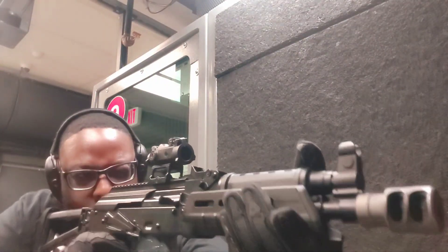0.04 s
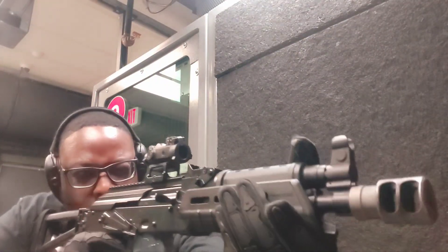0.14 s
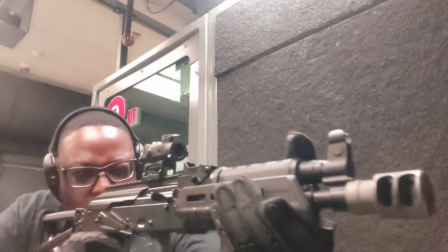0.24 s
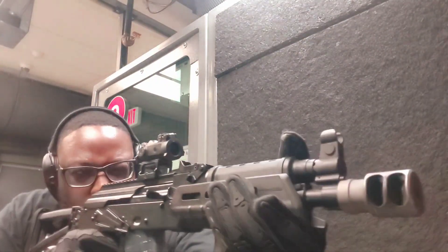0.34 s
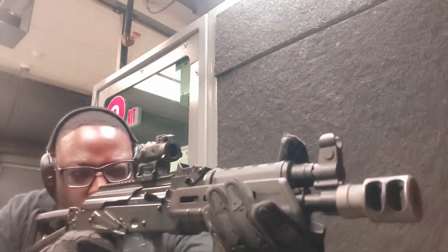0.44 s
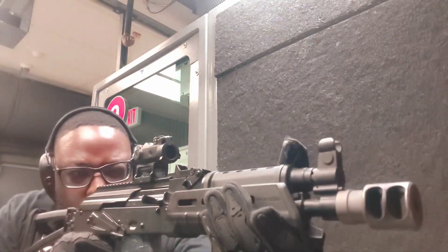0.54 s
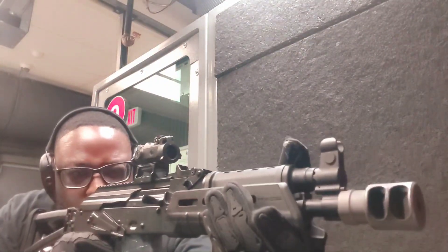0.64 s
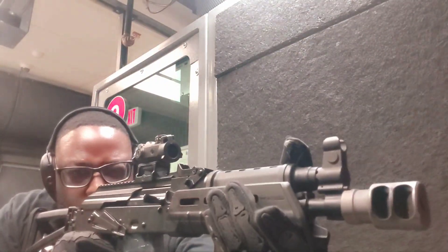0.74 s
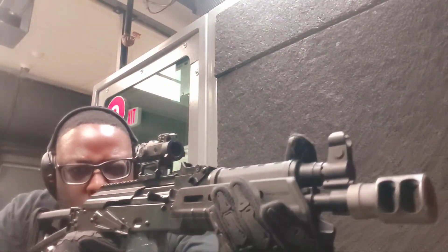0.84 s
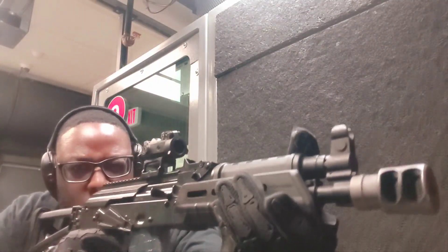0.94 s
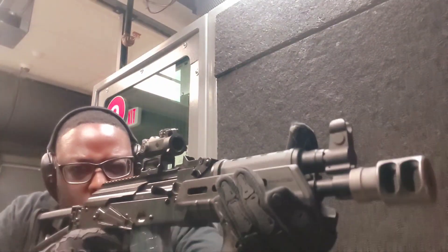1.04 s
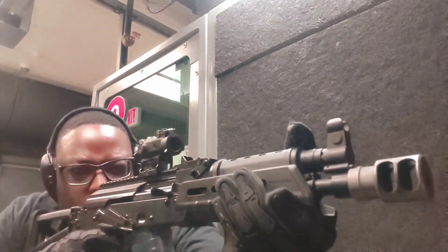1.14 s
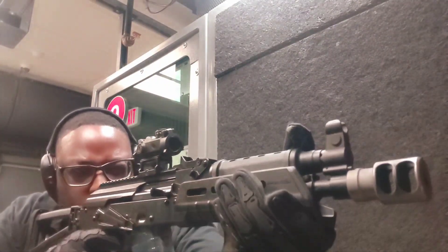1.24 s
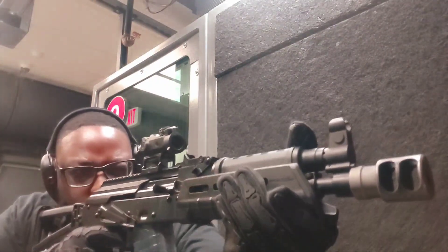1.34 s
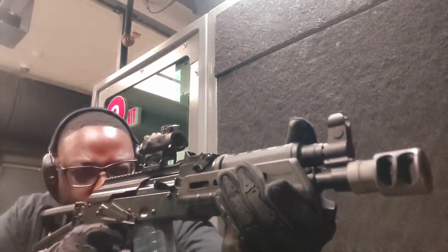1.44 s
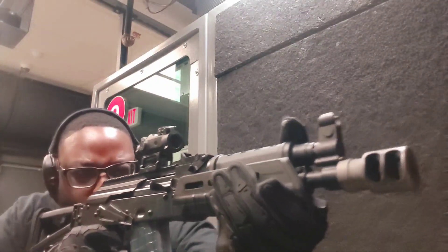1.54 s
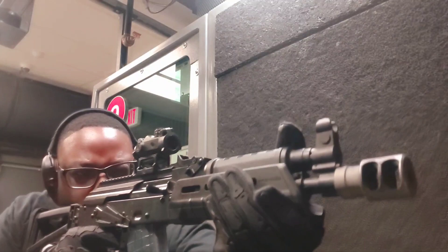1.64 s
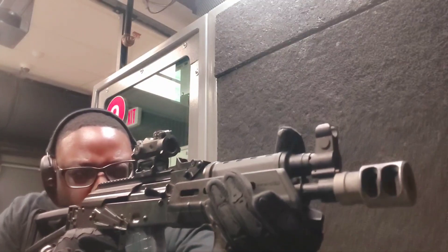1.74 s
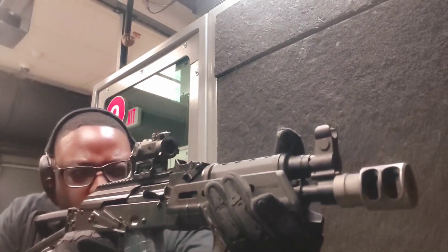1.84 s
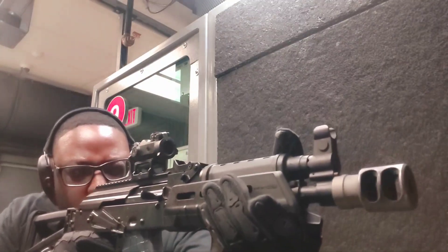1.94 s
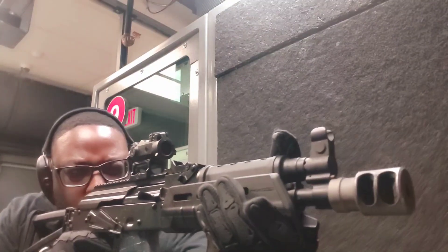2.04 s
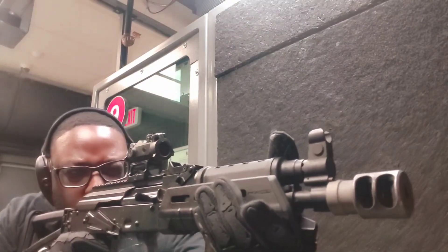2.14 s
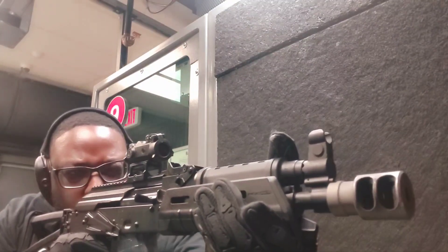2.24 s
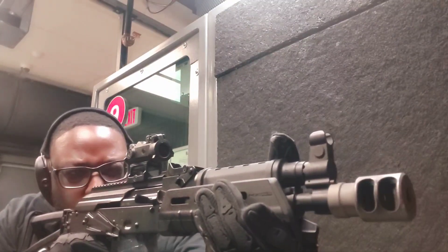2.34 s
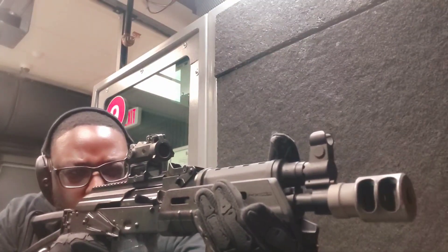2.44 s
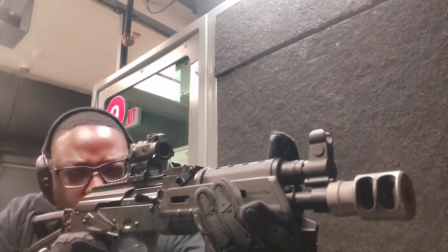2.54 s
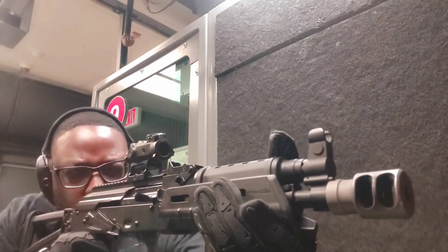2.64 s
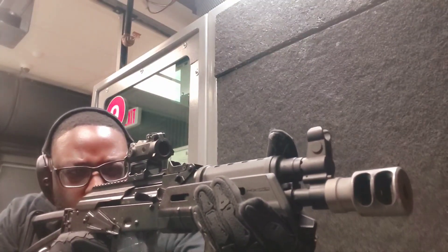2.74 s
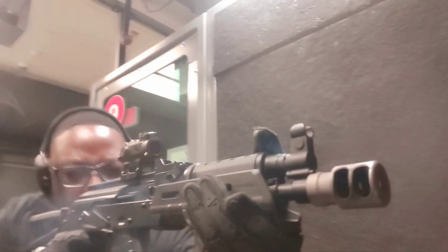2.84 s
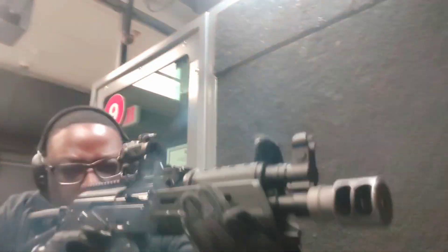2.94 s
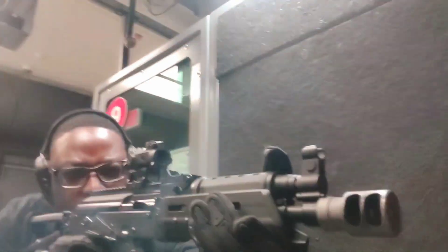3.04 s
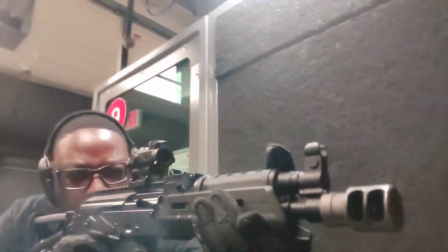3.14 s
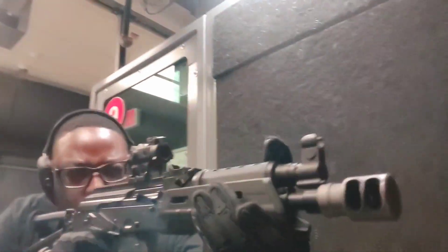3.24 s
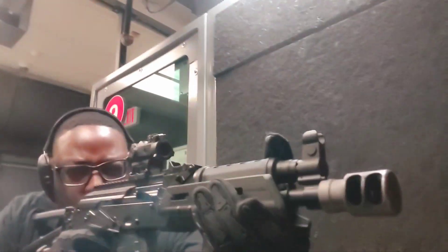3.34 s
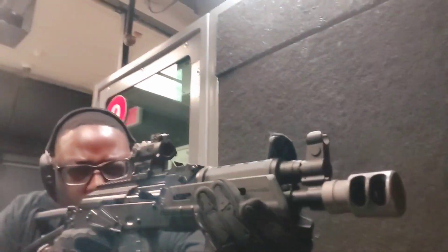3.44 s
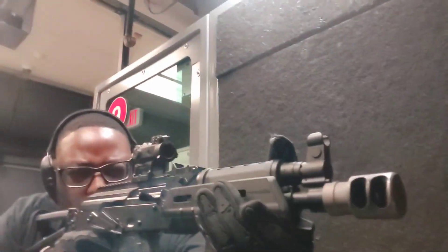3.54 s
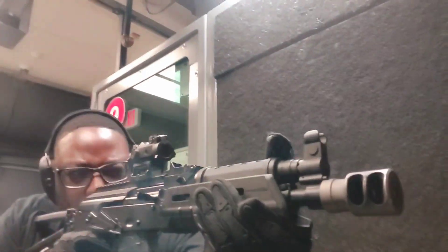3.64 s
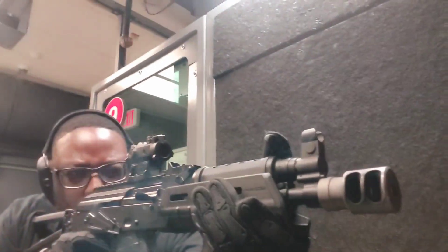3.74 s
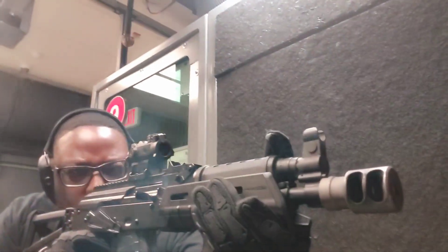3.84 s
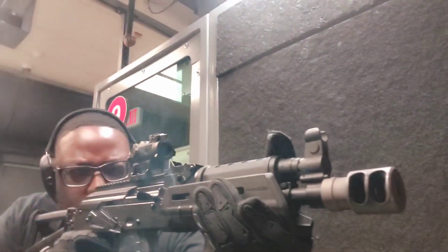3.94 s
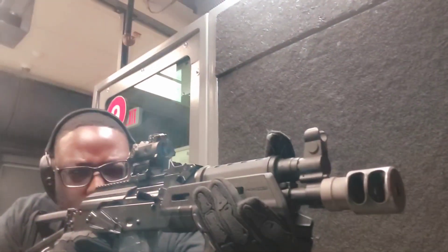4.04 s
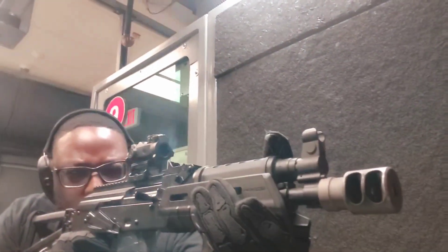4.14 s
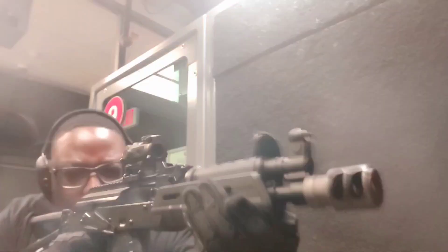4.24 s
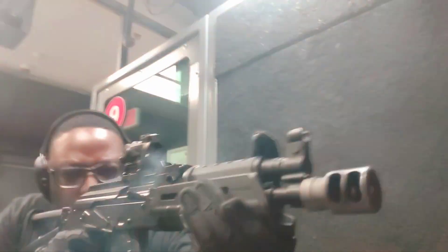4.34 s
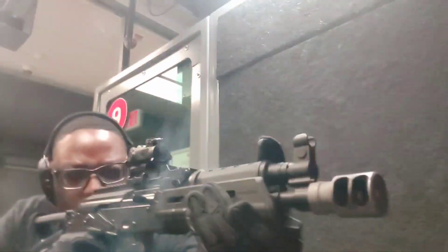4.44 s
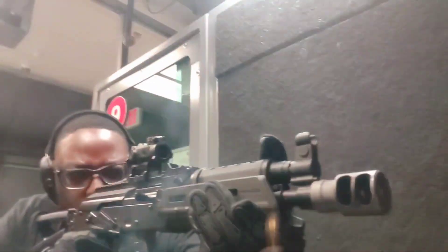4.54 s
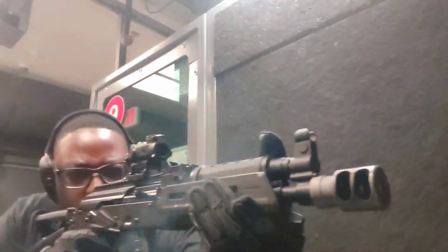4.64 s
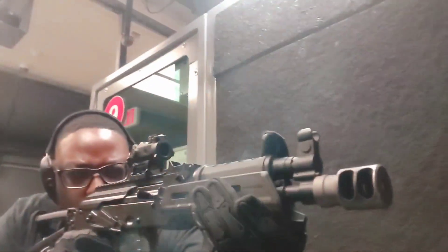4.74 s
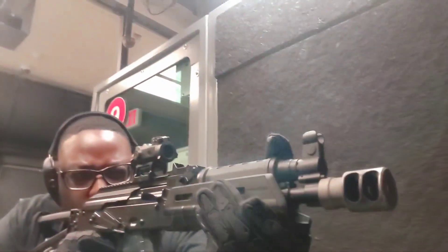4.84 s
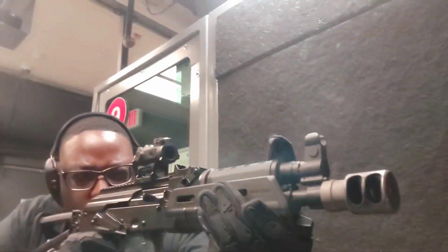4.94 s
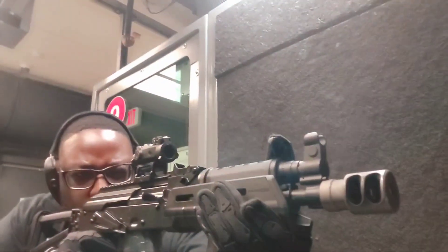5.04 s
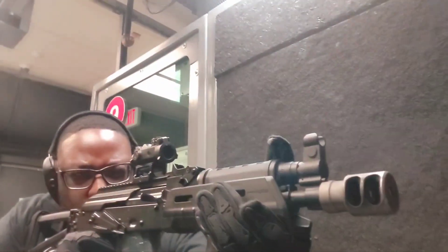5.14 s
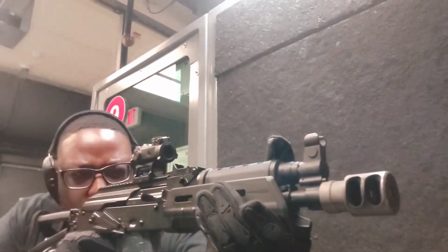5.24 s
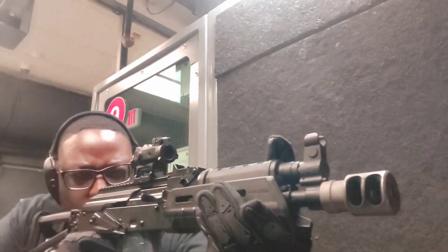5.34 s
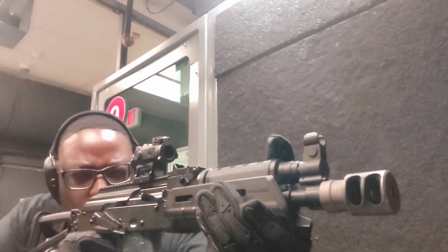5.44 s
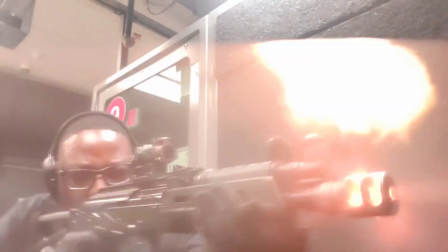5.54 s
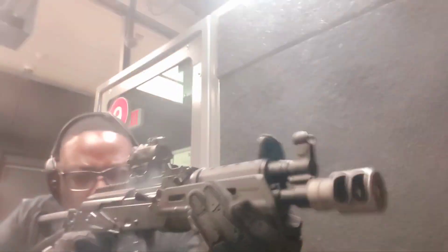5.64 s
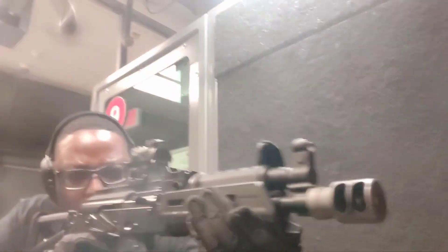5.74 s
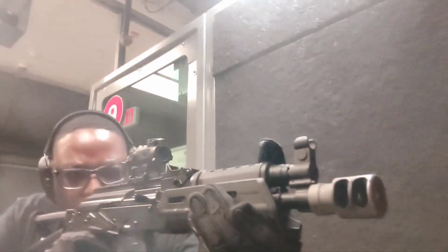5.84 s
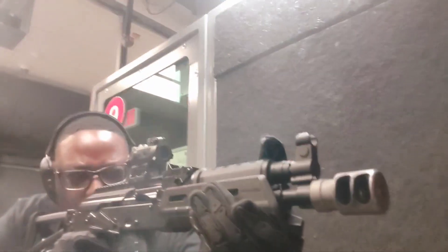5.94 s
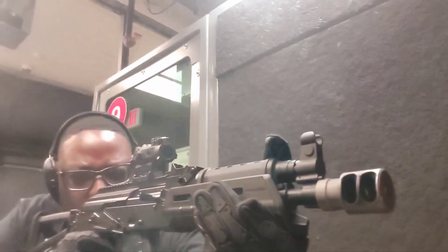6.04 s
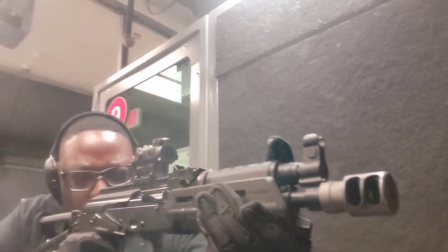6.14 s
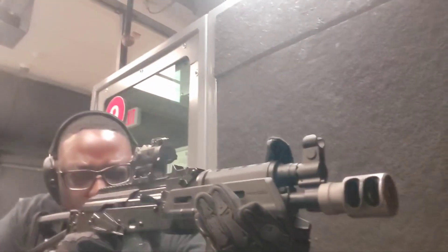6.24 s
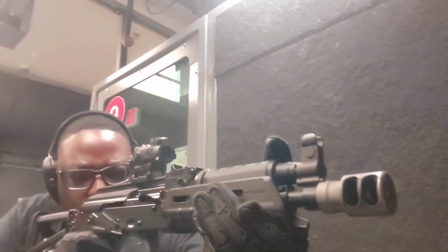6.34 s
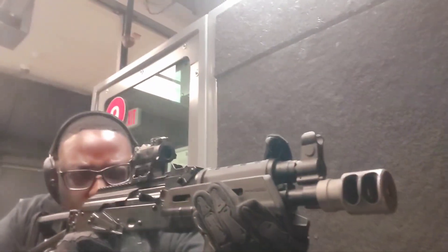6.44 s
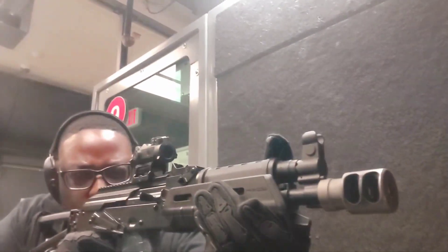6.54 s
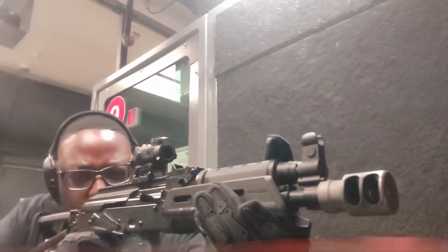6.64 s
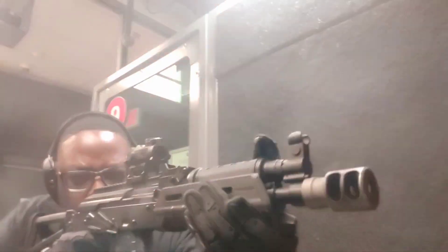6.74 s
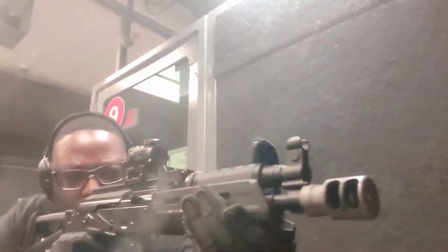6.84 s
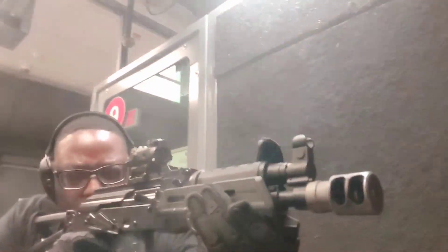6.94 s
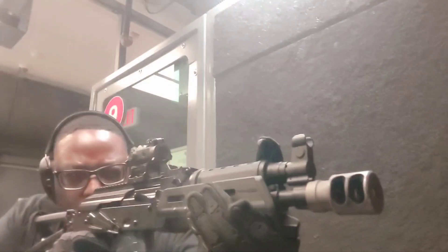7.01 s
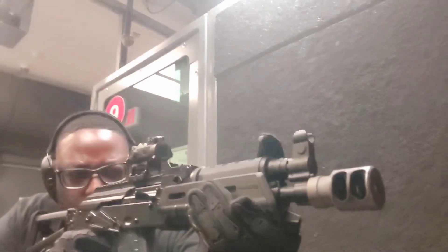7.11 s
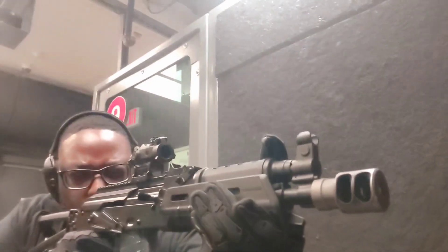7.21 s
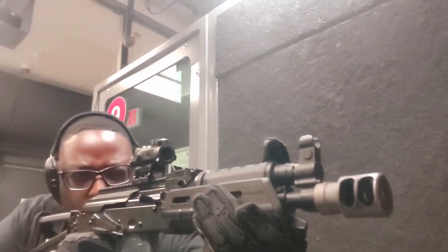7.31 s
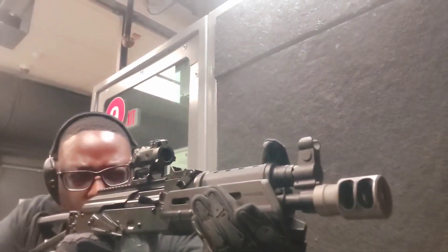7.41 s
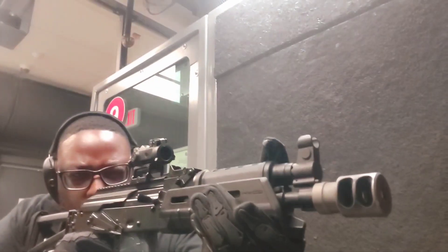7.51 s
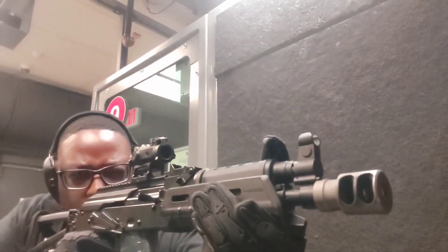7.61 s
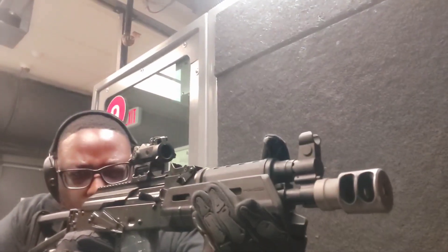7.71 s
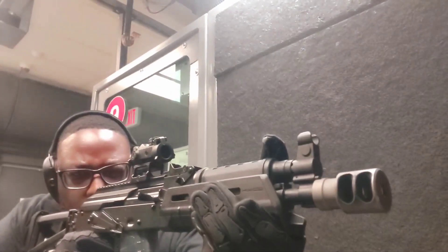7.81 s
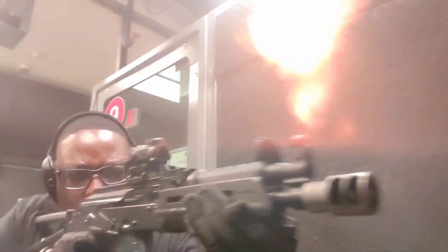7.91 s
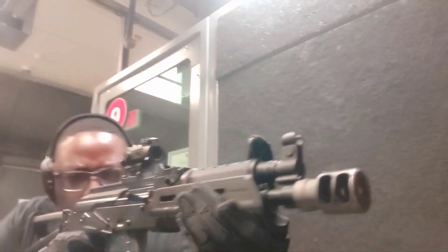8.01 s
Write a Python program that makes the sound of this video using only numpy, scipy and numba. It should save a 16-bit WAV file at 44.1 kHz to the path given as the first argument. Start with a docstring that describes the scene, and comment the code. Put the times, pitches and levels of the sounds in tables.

```python
"""First you hear ventilation, a low rush and spent brass cases tinkling in an indoor shooting range.
Then a pistol barks from a neighbouring lane, and a rifle fires right beside the listening phone.
Each blast fills the concrete hall with echoes and booms back from the far end.
Between shots, cases clack and ring on the booth and floor, and one rolls to rest.
The blasts overload the two microphones, and a limiter briefly turns the sound down."""
import sys
import numpy as np
from scipy import signal
from scipy.fft import rfft, irfft
from scipy.io import wavfile
from numba import njit

SR = 44100
rng = np.random.default_rng(int(sys.argv[2]) if len(sys.argv) > 2 else 0)


def transcribe(u):
    """Save the signal u as a 16-bit wav file named by the first command-line argument.

    u: samples, shape (n,) or (channels, n), limited to [-1, 1]; the rate is SR.
    q: integer samples, one column per channel.
    """
    v = np.clip(np.atleast_2d(u).T, -1, 1)
    q = np.round(v * 32767).astype(np.int16)
    wavfile.write(sys.argv[1], SR, q)


N = 355887
TAIL = 98304  # samples given to one shot and its echoes
AGE = np.arange(TAIL) / SR  # seconds since a sound began


def undb(db):
    """Turn decibels into a number to multiply by."""
    return 10 ** (np.asarray(db) / 20)


def fade(t60, t=AGE):
    """Die away by 60 dB every t60 seconds."""
    return np.exp(-np.log(1000) * t / t60)


def at_hz(table, hz):
    """Look up a table at any frequency, blending between its rows."""
    f, *columns = np.transpose(table)
    return [np.interp(np.log(hz + 1), np.log(f), c) for c in columns]


def add(out, s, sound):
    """Mix a sound in, starting at s seconds."""
    i = max(int(s * SR), 0)
    out[:, i:i + sound.shape[-1]] += sound[..., :N - i]


# Pitches the booth around the phone boosts or weakens: f/Hz, width/Hz, level/dB
BOOTH_RESONANCES = [(188.5, 11, -6), (242, 97, 2), (437, 140, 1), (894, 48, 4.5), (1068, 38, 4.5),
                    (1212, 26, 4.5), (1320, 80, 2.5), (1800, 44, -1), (1850, 49, 2), (2035, 41, 0),
                    (2710, 830, 1)]
def booth_spectrum(colour, size, alike_hz=380):
    """Spectrum of noise at two close microphones: the bass is alike in both, the treble is not."""
    hz = np.fft.rfftfreq(size, 1 / SR)
    mid, side = rfft(rng.standard_normal((2, size)))
    alike = .8 / (1 + (hz / alike_hz) ** 2)
    booth_db = sum(db / (1 + (2 * (hz - f) / width) ** 2) for f, width, db in BOOTH_RESONANCES)
    gain = undb(at_hz(colour, hz)[0] + booth_db)
    pair = mid * np.sqrt(1 + alike) + np.array([[1], [-1]]) * side * np.sqrt(1 - alike)
    return pair * gain / np.sqrt(2 * np.mean(gain ** 2))


def noise(colour, size=TAIL):
    """Steady stereo noise of strength 1; its colour table sets the balance of low and high."""
    return irfft(booth_spectrum(colour, size), size)


# Colours of the ventilation and of the low rush and opening rumble: f/Hz, level/dB
VENT_COLOUR = [(25, -11.5), (70, -3.5), (130, -0.5), (240, -6.5), (335, -14), (520, -11), (760, -22),
               (1150, -13.5), (2400, -21), (5000, -38), (9000, -55.5), (15000, -72)]
LOW_RUSH_COLOUR = [(25, -13), (70, 0), (150, 0), (300, -8), (520, -10.5), (800, -17.5), (1500, -19),
                   (3300, -27), (6000, -41.5), (9500, -48), (15000, -75.5)]
def air(start_s=.48, crest_s=1.58, rush_t60=1.35):
    """Steady ventilation; a low rumble is already dying away at the start, and a low rush swells and dies away."""
    t = np.arange(N) / SR
    swell = np.sin(np.pi / 2 * np.clip((t - start_s) / (crest_s - start_s), 0, 1)) ** 2
    rush = undb(-38) * swell * fade(rush_t60, np.maximum(t - crest_s, 0))
    opening_fade = undb(-51.5) * fade(rush_t60, t)
    return undb(-56.5) * noise(VENT_COLOUR, N) + (rush + opening_fade) * noise(LOW_RUSH_COLOUR, N)


def scatter(sound, t60=.24, size=16384):
    """The floor and partitions smear a small sound into many echoes, keeping its energy."""
    echoes = rng.standard_normal((2, size)) * fade(t60, AGE[:size])
    return signal.fftconvolve(sound, echoes / np.sqrt(np.sum(echoes ** 2) / 2), axes=1)


# Colour of metal hitting something hard: f/Hz, level/dB
CLACK_COLOUR = [(200, -25), (900, -12.5), (2100, 15.5), (4000, 2), (8500, 0), (16000, -31)]
def brass(tones, hz, ring_db, clack_db, size=8192):
    """A brass tube hits something once: it clacks and rings with several tones."""
    t = AGE[:size]
    phases = rng.uniform(0, 2 * np.pi, (len(tones), 2, 1))
    ring = sum(undb(db) * np.sin(2 * np.pi * hz * multiple * t + phase) * fade(t60, t)
               for (multiple, db, t60), phase in zip(tones, phases))
    return undb(ring_db) * ring + undb(clack_db) * noise(CLACK_COLOUR, size) * fade(.019, t)


# Tones of a case in the next lane: multiple of its pitch, level/dB, fade time/s
FAR_TONES = [(.472, -10, .06), (.497, -6, .08), (1, -4, .16), (1.006, -9.5, 0.096)]
# Cases landing there: t/s, first flight/s, ring level/dB, clack level/dB
FAR_LANDINGS = [(.262, .425, -60.5, -73), (2.755, .53, -68, -72.5), (5.195, .24, -66, -75)]
def far_cases(hz=10800, rebound=.625, rise_db=.2):
    """Cases bounce behind a partition, each flight shorter than the last; only their echoes arrive."""
    out = np.zeros((2, N))
    for s, flight_s, ring_db, clack_db in FAR_LANDINGS:
        for bounce in range(5):
            add(out, s, undb(rise_db * bounce) * scatter(brass(FAR_TONES, hz, ring_db, clack_db)))
            s += flight_s * rebound ** bounce
    return out


# Tones of a nearby case: multiple of its pitch, level/dB, fade time/s
NEAR_TONES = [(.265, -18, .08), (.40, -20, .1), (0.489, -23, .15), (0.551, -24, .1), (.645, -19, 0.1),
              (.965, -20.5, 0.076), (.988, -5.5, 0.13), (1, -15.5, 0.089), (1.03, -16, 0.12)]
# Cases striking the booth and its floor: t/s, ring level/dB, f/Hz, clack level/dB
NEAR_HITS = [(2.993, -52, 12500, -22), (4.528, -58, 12500, -22), (4.745, -41, 13300, -24),
             (4.7674, -56, 13200, -32), (4.8564, -56, 13250, -45), (4.9734, -50, 13300, -35),
             (6.0051, -42, 13000, -34), (6.8942, -50, 12200, -17), (7.0274, -49, 13250, -12.5),
             (7.2863, -54, 13200, -36), (7.324, -58, 12950, -42), (7.6126, -68, 12900, -50),
             (7.7925, -54, 13000, -64)]
def near_cases(slap_s=.004):
    """Each case lands on one end, then slaps down with the other."""
    out = np.zeros((2, N))
    for s, ring_db, hz, clack_db in NEAR_HITS:
        hit = brass(NEAR_TONES, hz, ring_db, clack_db)
        add(out, s, hit)
        add(out, s + slap_s, undb(-7) * brass(NEAR_TONES, hz, ring_db, clack_db))
        add(out, s, undb(-10) * scatter(hit))
    return out


def rolling_case(start_s=4.8, length_s=.62, ticks_per_s=24, hz=13150, fade_db_per_s=12):
    """One case rolls to rest, its rim ticking ever more softly."""
    out = np.zeros((2, N))
    for tick in range(int(length_s * ticks_per_s)):
        age = (tick + rng.uniform()) / ticks_per_s
        db = -66 - fade_db_per_s * age + 2 * rng.standard_normal()
        add(out, start_s + age, scatter(brass(NEAR_TONES, hz, ring_db=db, clack_db=db + 3)))
    return out


def knock(s, db, hz, t60):
    """A dull knock on the bench: a short burst of noise around one pitch."""
    out = np.zeros((2, N))
    colour = [(hz / 3, -25), (hz * .42, 0), (hz * 1.3, 0), (hz * 2, -18), (hz * 20, -55)]
    add(out, s, undb(db) * noise(colour) * fade(t60))
    return out


# How the hall's echoes die away: f/Hz, early fade time/s, late fade time/s, late level/dB
HALL_FADES = [(40, 0.92, 5.7, -18), (115, 1, 5.7, -29), (400, 0.65, 2.04, -28.5), (1170, 0.43, 2.08, -22),
              (3950, 0.41, 1.36, -21.5), (7800, 0.43, 0.73, -30.5), (15000, 0.23, 1.1, -39.5)]
def hall_echoes(colour, paths, peak_s, swell, stir_hz=3000, bands=14):
    """Echoes swell, the low ones last; they die fast near the booth and linger down the range."""
    hz = np.fft.rfftfreq(TAIL, 1 / SR)
    same = 1 / (1 + (hz / stir_hz) ** 2)  # moving air changes mainly the treble from shot to shot
    spectrum = np.sqrt(same) * paths + np.sqrt(1 - same) * booth_spectrum(colour, TAIL)
    centres = np.geomspace(40, 15000, bands)
    out = 0
    for centre, pick in zip(centres, np.eye(bands)):
        band = irfft(spectrum * np.interp(np.log(hz + 1), np.log(centres), pick))
        early_t60, late_t60, late_db = at_hz(HALL_FADES, centre)
        lowness = 1 / (1 + (centre / 300) ** 2)
        fullest_s = peak_s + .11 * lowness
        since = np.maximum(AGE - fullest_s, 0)
        grow = np.minimum(AGE / fullest_s, 1) ** (swell + lowness / 2)
        out += band * grow * (fade(early_t60, since) + undb(late_db) * fade(late_t60, since))
    return out


# Deep notes that ring between the walls (standing waves): f/Hz, level/dB, fade time/s
HALL_NOTES = [(59.3, -6.5, 1.6), (67.9, -5, 1.5), (72.35, -0.5, 0.98), (81, -8, 0.73), (100.4, -6.5, 1.3),
              (105.75, 2, 1.0), (112, -9.5, 0.66), (126.8, -8, 1.5), (127.8, -4, 1.6), (144.4, 2, 0.74),
              (154.8, -15.5, 1.5), (241.1, -10.5, 0.78), (226.2, -12, .8), (410, -26, 0.87)]
def hall_boom(return_s, swell, spread=.19):
    """Deep notes grow until the blast is back from the far wall, then throb as they fade."""
    since = AGE - return_s
    grow = np.minimum(AGE / return_s, 1) ** swell
    out = 0
    for hz, db, t60 in HALL_NOTES:
        skew = spread * rng.standard_normal() * np.array([[1], [-1]])  # each comes from its own side
        out += undb(db) * np.cos(2 * np.pi * hz * since + skew) * fade(t60, np.maximum(since, 0))
    return grow * out


def muzzle_wave(hz, t60=.016, lag_s=.0002, echo_s=.0042):
    """A gun's first push of air rings briefly and echoes off the booth; the right side hears it later."""
    t = AGE - np.array([[0], [lag_s]])
    ages = np.maximum([t, t - echo_s], 0)
    direct, echo = np.sin(2 * np.pi * hz * ages) * fade(t60, ages)
    return direct + undb(-12.5) * echo


def gunshots(shots, colour, first_wave, boom, roar_db, peak_s, swell, crack_db, crack_t60):
    """Every shot: the first wave, a crack off the booth walls, then the hall's roar and boom."""
    out = np.zeros((2, N))
    paths = booth_spectrum(colour, TAIL)  # the echo pattern all this gun's shots share
    build_up = 1 - np.exp(-AGE / .005)
    for s, echo_db in shots:
        crack = undb(crack_db) * noise(colour) * build_up * fade(crack_t60)
        roar = undb(roar_db) * hall_echoes(colour, paths, peak_s, swell)
        add(out, s, first_wave + undb(echo_db) * (crack + roar + boom))
    return out


# Pistol shots: t/s, echo level/dB
PISTOL_SHOTS = [(1.5977, -6.5), (6.1174, -6.5), (7.8593, 0.5)]
# Colour of the pistol's blast in the hall: f/Hz, level/dB
PISTOL_BLAST = [(25, -35), (50, -16), (110, -6.5), (200, -4), (450, 0.5), (1000, 0), (2200, -4.5),
                (4500, -15.5), (9000, -21.5), (16000, -45)]
def pistol():
    """A pistol behind a partition: a short bark, then the hall swells over it."""
    bark = undb(2) * muzzle_wave(hz=780) + muzzle_wave(hz=1220)
    boom = undb(-23) * hall_boom(return_s=.17, swell=.15)
    return gunshots(PISTOL_SHOTS, PISTOL_BLAST, bark, boom,
                    roar_db=-1, peak_s=.048, swell=.8, crack_db=-8, crack_t60=.43)


# Rifle shots: t/s, echo level/dB
RIFLE_SHOTS = [(2.804, -1.5), (4.2195, 0), (5.561, -1.5), (6.71, -1.5), (7.924, 5)]
# Colour of the rifle's blast in the hall: f/Hz, level/dB
RIFLE_BLAST = [(25, -16), (50, -15), (110, 2.5), (200, -3), (330, -4), (410, 2.5), (560, -2), (1000, -3),
               (2200, -3.5), (4500, -12.5), (9000, -20), (16000, -37)]
def rifle(hammer_lead_s=.016):
    """A rifle close by: the hammer falls, then comes a violent crack and a deep boom."""
    boom = undb(-17) * hall_boom(return_s=.228, swell=1.7)
    snap = undb(-10) * noise(RIFLE_BLAST) * fade(.03)
    out = gunshots(RIFLE_SHOTS, RIFLE_BLAST, snap, boom,
                   roar_db=-3.5, peak_s=.052, swell=.47, crack_db=2.5, crack_t60=.26)
    for s, _ in RIFLE_SHOTS:
        add(out, s - hammer_lead_s, undb(-44) * noise(CLACK_COLOUR) * fade(.17))
    return out


def scene():
    """Both guns, a knock, the air of the hall and the cases, which fall to the right."""
    bench = knock(s=4.792, db=-30, hz=560, t60=.15)
    to_right = undb([[-8], [-1]])
    return rifle() + pistol() + bench + air() + (far_cases() + near_cases() + rolling_case()) * to_right


@njit
def follow_level(x, attack, release):
    """Track how loud the sound is, rising fast and falling slowly."""
    out, level = np.empty(len(x)), 0.
    for i in range(len(x)):
        level += (x[i] - level) * (attack if x[i] > level else release)
        out[i] = level
    return out


# Colours of the small holes leading to the two microphones: f/Hz, level/dB
LEFT_HOLE = [(300, -2), (2500, -4.5), (5000, -4.5), (7500, -17.5), (9200, -27.5), (11000, -1), (12800, 8),
             (16000, 13)]
RIGHT_HOLE = [(300, -3), (2500, -6), (5000, -1.5), (7500, -1), (9500, -5.5), (11000, 2), (12800, 10.5),
              (16000, 11)]
def microphone_hole(x, colour, size=512):
    """A microphone's hole reshapes the treble and lets the bass through unchanged."""
    db = at_hz(colour, np.fft.rfftfreq(size, 1 / SR))[0]
    cepstrum = irfft(np.log(undb(db - db[0])))
    # folding makes the filter ring only after a sound, never before it
    fold = 1 + np.sign(size / 2 - np.arange(size)) * (np.arange(size) > 0)
    click_response = irfft(np.exp(rfft(cepstrum * fold)))
    return signal.fftconvolve(x, click_response)[:N]


def record(dry, limit_db=-5.5, attack_s=.0008, release_s=.017, low_hz=42, top_hz=15750):
    """The microphones overload, the right one sooner; a limiter misses the first peak, then ducks both."""
    ceiling = undb([[4], [-5]])
    left, right = ceiling * np.tanh(dry / ceiling)
    x = np.array([microphone_hole(left, LEFT_HOLE), microphone_hole(right, RIGHT_HOLE)])
    x = signal.sosfilt(signal.butter(2, low_hz, "high", fs=SR, output="sos"), x)
    level = follow_level(np.abs(x).max(axis=0), 1 / (attack_s * SR), 1 / (release_s * SR))
    x = x / np.maximum(level / undb(limit_db), 1)
    x = x / (1 + x ** 8) ** (1 / 8)  # round off the peaks that slip through
    return signal.sosfilt(signal.ellip(10, .2, 70, top_hz, fs=SR, output="sos"), x)


dry = scene()
out = record(dry)
transcribe(out)
```